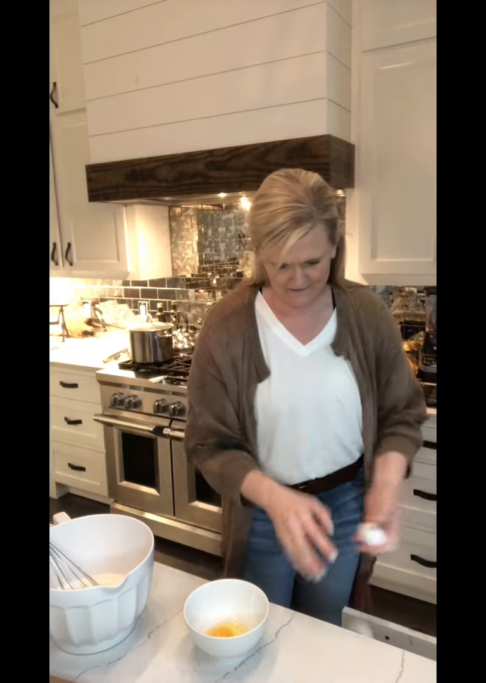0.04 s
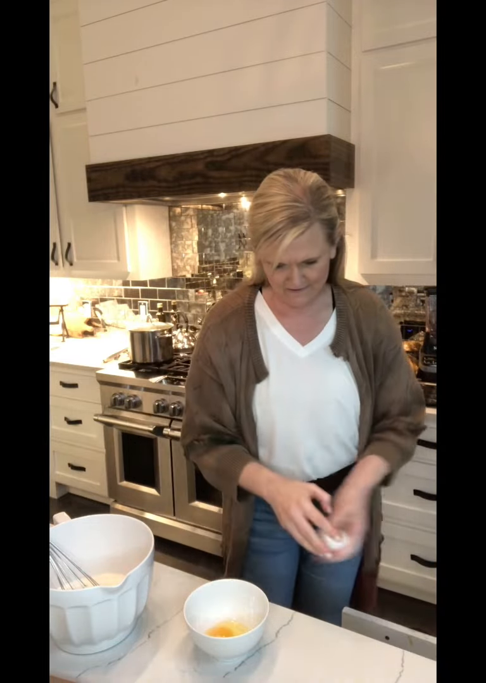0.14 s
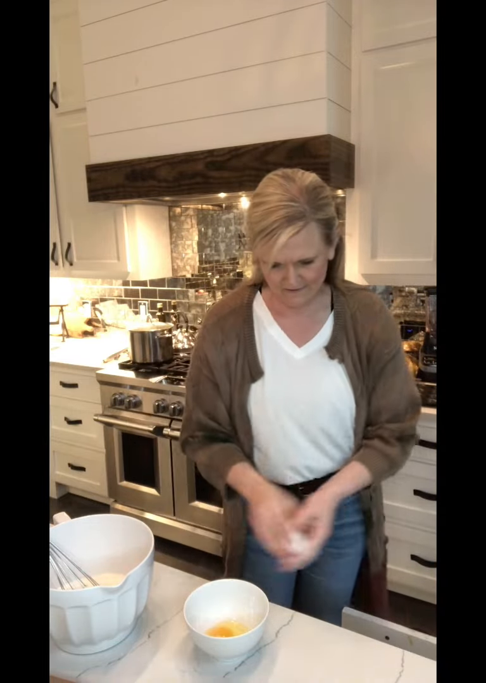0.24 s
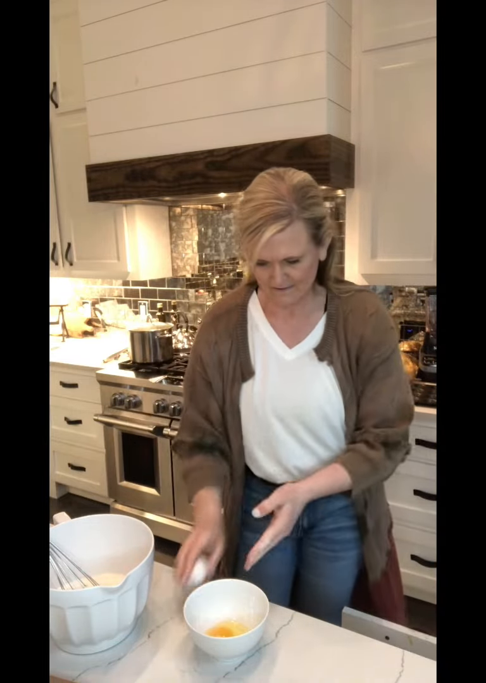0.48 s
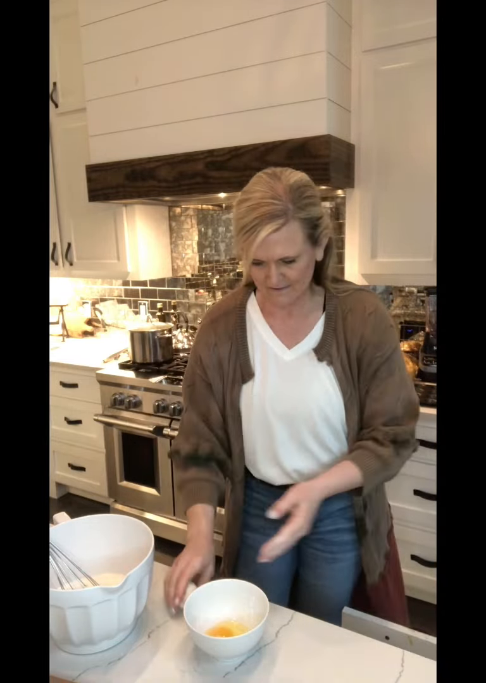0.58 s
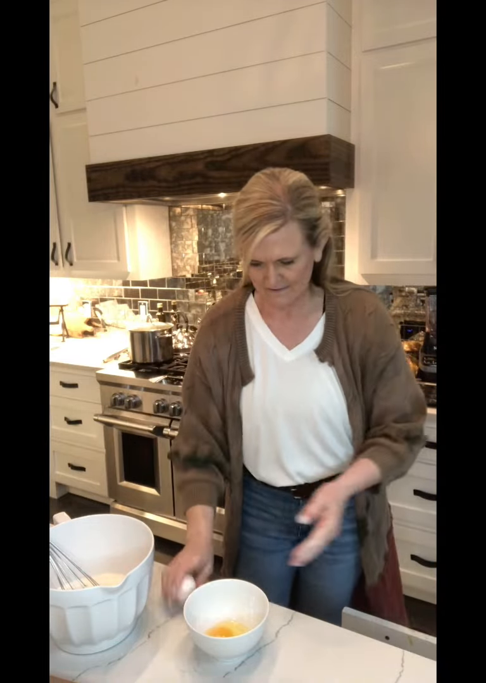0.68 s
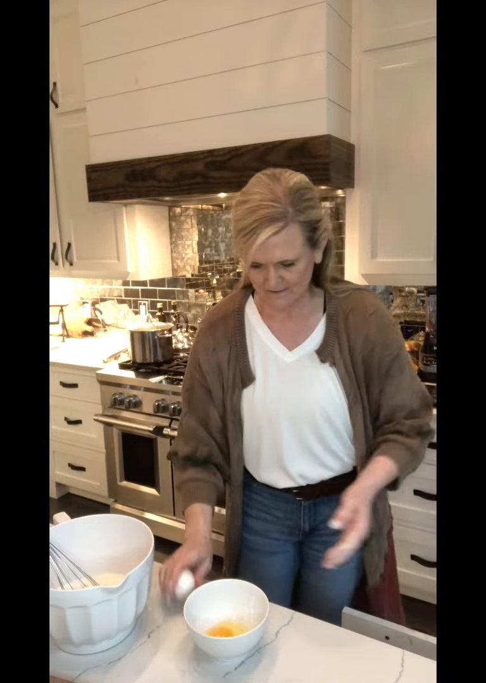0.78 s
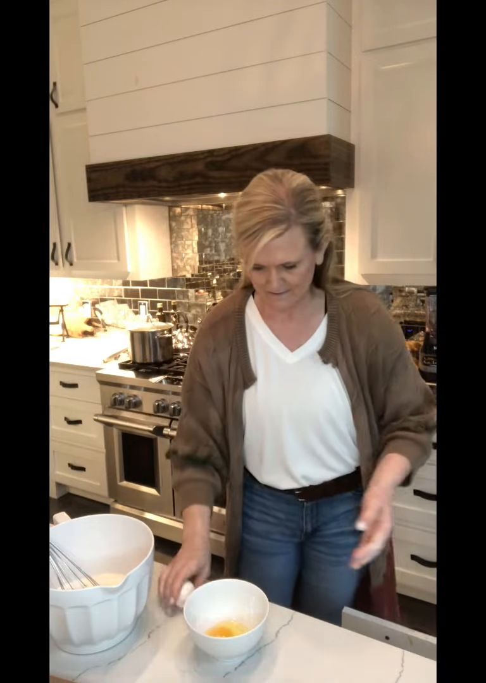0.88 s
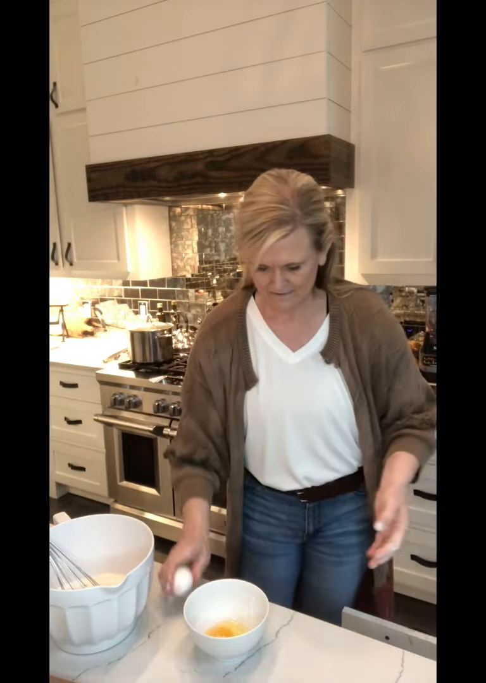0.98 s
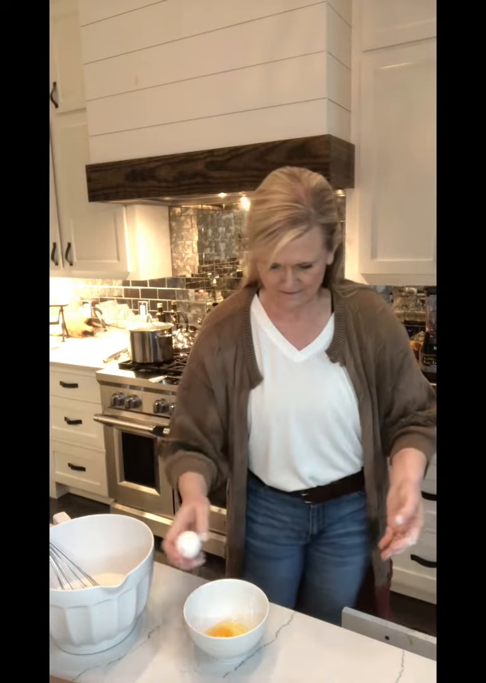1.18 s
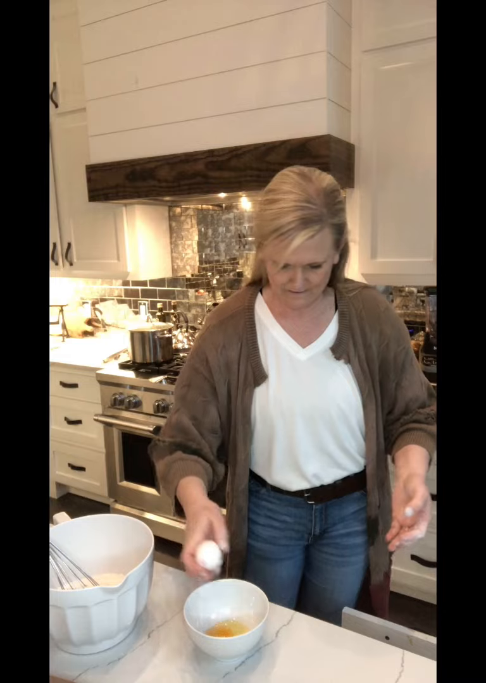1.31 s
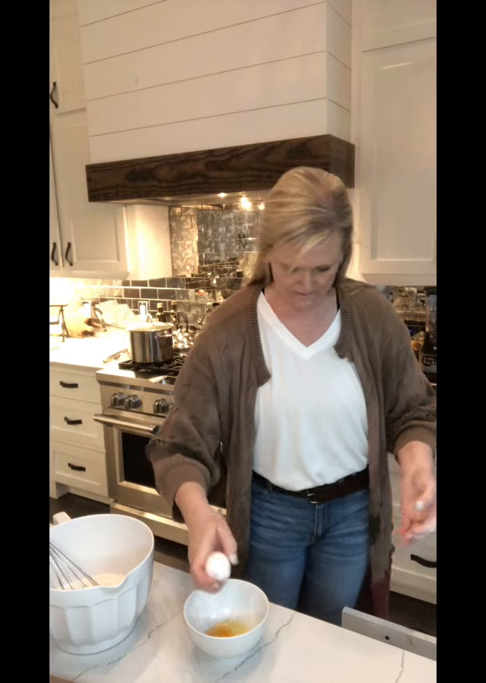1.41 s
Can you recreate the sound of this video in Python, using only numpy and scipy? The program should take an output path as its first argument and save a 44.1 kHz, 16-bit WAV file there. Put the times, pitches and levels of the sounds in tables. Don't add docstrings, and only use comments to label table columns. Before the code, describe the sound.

Egg cracking in a kitchen: hollow bin knock, hand thud, two sharp raps, faint shell crackles

```python
import sys
import numpy as np
from scipy import signal
from scipy.fft import rfft, irfft, next_fast_len
from scipy.io import wavfile
from scipy.ndimage import uniform_filter1d, map_coordinates

SR = 44100
rng = np.random.default_rng(int(sys.argv[2]) if len(sys.argv) > 2 else 0)


def file_out(sig):
    cols = np.atleast_2d(sig).T
    lim = np.clip(cols, -1, 1)
    pcm = np.round(lim * 32767).astype(np.int16)
    wavfile.write(sys.argv[1], SR, pcm)


def attenuation_scalar(level_db):
    decades = np.asarray(level_db, float) / 20
    return 10 ** decades


N = 63945

WET_DB = [-51, -46, -44.5, -47, -71.5]
LAG_S = [0.00291, .003, 0.00238, 0.00184, 0.00012]
# hz, power_db_per_hz
DENTED_POWER = [(40, 3.5), (200, -9), (400, -5.5), (1500, -12.5), (2600, -10.5), (5000, -16), (9000, -19.5),
                (16000, -26)]


def unit(x):
    return x / np.sqrt(np.mean(x ** 2) + 1e-20)


def along(points, hz):
    f, v = np.transpose(points)
    return np.interp(np.log(hz + 1), np.log(f + 1), v)


def lift(peaks, hz):
    return sum(db * np.exp(-((hz - centre) / width) ** 2) for centre, width, db in peaks)


def filtered(x, response):
    m = next_fast_len(len(x) + SR // 2)
    return irfft(rfft(x, m) * response(np.fft.rfftfreq(m, 1 / SR)), m)[:len(x)]


def hiss(spectrum, patchy_db):
    z = signal.stft(rng.standard_normal(N + 512), nperseg=512)[2]
    field = uniform_filter1d(uniform_filter1d(rng.standard_normal(z.shape), 6, 0), 10, 1)
    x = signal.istft(z * attenuation_scalar(patchy_db * unit(field)), nperseg=512)[1][:N]
    return unit(filtered(x, lambda hz: attenuation_scalar(along(spectrum, hz))))


def contact_force(rise_s, contact_s, t):
    stiff_hz = 690
    grit_s, grit_db = 0.002, -3.5
    hz = np.fft.rfftfreq(len(t), 1 / SR)
    knots, spikes = rng.standard_normal((2, len(t)))
    scatter = map_coordinates(knots, [hz * contact_s * 1.3]) ** 2
    late = rise_s + contact_s / 2 * hz / (hz + stiff_hz) * scatter
    phase = -2j * np.pi * np.cumsum(late) * hz[1]
    clean = irfft(np.exp(phase), len(t)) * (t < 0.1)
    grit = spikes * (1 - np.exp(-t / rise_s)) * np.exp(-t / (contact_s + grit_s))
    return clean + attenuation_scalar(grit_db) * grit / np.linalg.norm(grit)


def ringing(hz, body, lag_s, tilt_db, piece):
    colour = attenuation_scalar(tilt_db * np.log2((hz + 100) / 2000) + lift(piece, hz))
    bending = np.exp(-2j * np.pi * lag_s * 300 * np.log((hz + 60) / SR))
    modes = 0
    for j, (centre, width, db) in enumerate(body):
        damping = 1j * hz * width
        modes = modes + (-1) ** j * attenuation_scalar(db) * damping / (centre ** 2 - hz ** 2 + damping)
    return colour * bending * modes


def strike(hits, body, lag_s, pieces=None):
    piece_width = 0.11
    scale_db = -1 - 6
    out, t = np.zeros(N + SR), np.arange(SR // 5) / SR
    for k, (start_s, db, rise_s, contact_s, tilt_db) in enumerate(hits):
        piece = []
        if pieces:
            pitch_hz, lift_db = pieces[k]
            piece = [(pitch_hz, piece_width * pitch_hz, lift_db)]
        force = contact_force(rise_s, contact_s, t)
        y = filtered(force, lambda hz: ringing(hz, body, lag_s, tilt_db, piece))
        loudest = np.sqrt(uniform_filter1d(y * y, size=SR // 100).max())
        out[round(start_s * SR):][:len(t)] += attenuation_scalar(db + scale_db) * y / loudest
    return out[:N]


def room(hits, power, wet_db):
    # hz, t60_s
    decay = [(60, 0.19), (250, 0.88), (1000, 1), (4000, 1), (8000, 0.69), (11000, 0.44), (16000, 0.35)]
    build_s = 0.0013
    out, t = np.zeros(N + 2 * SR), np.arange(SR) / SR
    for start_s, db, *_ in hits:
        hz, frame_s, z = signal.stft(rng.standard_normal(SR), SR, nperseg=256)
        z = z * attenuation_scalar(along(power, hz)[:, None] - 60 * frame_s / along(decay, hz)[:, None])
        tail = signal.istft(z, SR, nperseg=256)[1][:SR]
        tail = tail / np.sqrt(np.mean(tail[:SR // 20] ** 2))
        tail = tail * (1 - np.exp(-(t / build_s) ** 2))
        out[round(start_s * SR):][:SR] += attenuation_scalar(wet_db + db - hits[0][1]) * tail
    return out[:N]


def appliance_hum():
    # hz, power_db_per_hz
    hum = [(12, -42), (20, -7.5), (222, -0.5), (285, -1.5), (328, -0.5), (472, -0.5), (1530, -14),
           (7520, -27.5), (16000, -33.5)]
    return attenuation_scalar(-61.5) * hiss(hum, patchy_db=0.5)


def booms():
    mode_hz = [66.5, 79, 95.5]
    # start_s, level_db
    blows = [
        (0, -68),
        (0.465, -52.5),
        (0.615, -58.5),
        (0.778, -50.5),
        (1.148, -61),
    ]
    in_step_s, rise_s, t60_s = 0.0583, 0.0093, 0.83
    t = np.arange(N) / SR
    out = np.zeros(N)
    for start_s, db in blows:
        since = (t - start_s).clip(0)
        swell = attenuation_scalar(db - 60 * since / t60_s) * (1 - np.exp(-(since / rise_s) ** 2))
        out += swell * sum(np.cos(2 * np.pi * hz * (t - start_s - in_step_s)) for hz in mode_hz)
    return out


def liner():
    # hz, power_db_per_hz
    plastic = [(60, -45), (120, -16), (250, 6), (800, -7), (1700, -3), (3500, -11.5), (7000, -17),
               (16000, -29)]
    # start_s, level_db, rise_s, fall_s
    brushes = [
        (0.054, -49.5, 0.073, 0.074),
        (0.214, -38, 0.0073, 0.013),
        (0.258, -59, 0.012, 0.1),
    ]
    t = np.arange(N) / SR
    shape = np.zeros(N)
    for start_s, db, rise_s, fall_s in brushes:
        swell = np.clip((t - start_s) / rise_s, 0, 1) ** 2
        shape += attenuation_scalar(db) * swell * np.exp(-np.clip(t - start_s - rise_s, 0, None) / fall_s)
    grain_db = 1.5 * map_coordinates(rng.standard_normal(400), [t * 200])
    return attenuation_scalar(grain_db) * shape * hiss(plastic, patchy_db=1.0)


def bin_knocks():
    # start_s, level_db, rise_s, contact_s, brightness_db_per_octave
    hits = [
        (.1535, -34, 0.00082, 0.0035, -2.5),
        (.1545, -34, 0.00089, 0.0014, -1.5),
        (.173, -30, 0.0019, 0.005, -4),
        (.2158, -28.5, 0.000633, 0.00091, -0.5),
        (.229, -46, 0.00076, 0.003, -21),
        (.237, -34.5, 0.0014, 0.0037, -12),
        (.285, -39.5, 0.0025, 0.0033, -4.5),
    ]
    # pitch_hz, width_hz, level_db
    body = [(157.4, 16, 14), (239.5, 16, 12), (396, 46, -14), (600, 50, -1.5), (920, 89, -3),
            (1210, 110, 1), (2050, 75, -1.5), (2870, 370, -23), (4040, 100, -7), (4340, 230, -11),
            (6300, 830, -13), (8000, 500, -32), (10100, 1700, -21.5)]
    # pitch_hz, lift_db
    spots = [(2800, 26), (1080, 14), (800, 12), (1240, 6.5), (1900, 6), (1310, -4), (247, 6)]
    # hz, power_db_per_hz
    power = [(40, -53), (90, -25), (170, -5.5), (300, -8), (1300, -11), (3000, -24.5), (7000, -27.5),
             (16000, -39.5)]
    return strike(hits, body, LAG_S[0], spots), (hits[1:4:2], power, WET_DB[0])


def counter_thud():
    # start_s, level_db, rise_s, contact_s, brightness_db_per_octave
    hits = [
        (.4648, -25, 0.00056, 0.00073, -0.6),
        (.478, -47.5, 0.0022, 0.0051, 2),
        (.491, -34, 0.0016, 0.0014, -16),
        (.503, -38, 0.0028, 0.0035, -7),
        (.516, -43, 0.00096, 0.0013, -3.5),
        (.528, -41, 0.0016, 0.0008, -6),
    ]
    # pitch_hz, width_hz, level_db
    body = [(188, 56, -7), (260.4, 20.6, 4.5), (381, 35, -1.5), (482, 42, -7.5), (653, 46, -2.5),
            (910, 200, -13), (1280, 240, -14.5), (1727, 55, -14.5), (2370, 110, -38), (3940, 340, -24.5),
            (4990, 190, -21), (7070, 530, -26.5), (11900, 5000, -44.5)]
    # hz, power_db_per_hz
    power = [(40, -44), (120, -34), (260, -4), (500, -8.5), (1100, -21.5), (1600, -32), (5000, -41),
             (16000, -60)]
    return strike(hits, body, LAG_S[1]), (hits[:1], power, WET_DB[1])


def first_rap():
    # start_s, level_db, rise_s, contact_s, brightness_db_per_octave
    hits = [
        (.6119, -16.5, 0.00016, 0.00028, 1),
        (.6135, -24, 0.00038, 0.0016, 0),
        (.6148, -31, 0.000295, 0.0013, 0),
        (.624, -40, .003, 0.0064, 1),
    ]
    # pitch_hz, width_hz, level_db
    body = [(264, 120, 12), (547, 220, 3), (946, 260, 5), (1400, 260, 3.5), (1990, 230, 2.5),
            (2630, 310, 0), (2900, 240, -2), (4100, 340, -1.5), (4600, 240, -2), (4990, 265, -1.5),
            (6040, 410, -5.5), (8020, 1300, -11), (10600, 2700, -15.5), (14200, 2800, -15)]
    # pitch_hz, lift_db
    spots = [(2000, 1.3), (1300, 8), (4900, 2), (5200, 1.8)]
    # hz, power_db_per_hz
    power = [(40, -49), (260, 7), (500, -7), (1200, -7), (2300, -13), (5000, -14.5), (9000, -21.5),
             (16000, -27)]
    return strike(hits, body, LAG_S[2], spots), (hits[:1], power, WET_DB[2])


def second_rap():
    # start_s, level_db, rise_s, contact_s, brightness_db_per_octave
    hits = [
        (.7787, -29.5, 0.00036, 0.00043, 0),
        (.7799, -22, 0.00026, 0.00056, 0.35),
        (.7815, -27.5, 0.00036, 0.00086, 0),
        (.7828, -29, 0.000283, 0.0018, 0),
        (.794, -40, 0.0046, 0.0056, 0.82),
    ]
    # pitch_hz, width_hz, level_db
    body = [(244, 74, 7.5), (620, 270, 3), (950, 300, 1), (2060, 280, 0), (2540, 310, 4.5), (2940, 490, 0),
            (3750, 430, -2.5), (4440, 550, -1.5), (4780, 340, -0.5), (6200, 430, -5), (7900, 670, -6.5),
            (10500, 740, -12.5), (12400, 840, -7.5), (15400, 570, -11)]
    # pitch_hz, lift_db
    spots = [(2770, 4), (4430, 3.7), (3700, 3.8), (6100, 7.9), (2800, 5.3)]
    return strike(hits, body, LAG_S[3], spots), (hits[1:2], DENTED_POWER, WET_DB[3])


def shell_crackles():
    # start_s, level_db, rise_s, contact_s, brightness_db_per_octave
    snaps = [(.948, -50, 0.00065, 0.0011, -4), (1.1122, -52.5, 0.00041, 0.0014, 0),
             (1.1312, -48, 0.0012, 0.0022, -1), (1.227, -59, 0.00038, 0.0016, -4),
             (1.2294, -38, 0.00052, 0.0011, 0), (1.2314, -43.5, 0.00041, 0.0011, 0.5),
             (1.2403, -64, .0003, 0.00092, -4), (1.2467, -41.5, 0.00036, 0.00086, -0.5),
             (1.2562, -53, 0.00029, 0.00113, 0), (1.266, -53, 0.00043, 0.0015, -5),
             (1.273, -53, 0.00028, 0.0023, 2.5), (1.288, -63, .004, .015, 0),
             (1.33, -60.5, 0.0066, 0.022, 3), (1.4137, -53.5, 0.00037, 0.00065, -5)]
    # pitch_hz, width_hz, level_db
    body = [(1480, 400, -11), (2240, 190, -4), (3000, 180, -9.5), (3690, 300, -7), (4310, 370, -3.5),
            (5000, 180, -1), (5860, 300, -10.5), (6400, 240, -7.5), (7530, 510, -12), (8700, 490, -11),
            (9390, 470, -8), (10700, 340, -8), (13300, 1300, -14)]
    # pitch_hz, lift_db
    pieces = [(4950, 4), (8000, 13.5), (3780, 8), (7000, 3), (4900, 3), (4760, 3), (4700, 7), (5600, 9.5),
              (4030, -4), (3900, 11), (8900, 3), (4500, 16), (12200, 1), (2140, 2.5)]
    return strike(snaps, body, LAG_S[4], pieces), (snaps[5:8:2], DENTED_POWER, WET_DB[4])


def scene():
    # pitch_hz, width_hz, lift_db
    room_modes = [(182.7, 22, 5), (245, 59, 10.5), (370, 23, 2.5), (487, 4.3, 5.5), (627, 55, 2.5),
                  (960, 51, 2), (1356, 120, 2.5)]
    blows = [bin_knocks(), counter_thud(), first_rap(), second_rap(), shell_crackles()]
    direct = sum(near for near, _ in blows)
    wet = sum(room(*feed) for _, feed in blows)
    uneven = rng.standard_normal(SR // 100)

    def room_colour(hz):
        return attenuation_scalar(lift(room_modes, hz) + 1.5 * map_coordinates(uneven, [hz / 60]))

    wet = filtered(wet, room_colour)
    return (direct + wet + liner() + booms() + appliance_hum())[None]


def band_limit(x):
    return signal.sosfilt(signal.butter(12, 17100, fs=SR, output="sos"), x)


def record(dry):
    # pitch_hz, width_hz, lift_db
    capsule = [(4520, 870, 2), (2300, 400, -1), (6340, 1450, 2.5)]
    low_cut_hz, end_hz = 42, 17100
    top_hz, edge_hz, top_db = 15700, 540, -20

    def microphone(hz):
        low_cut = (1j * hz / (low_cut_hz + 1j * hz)) ** 3
        treble = attenuation_scalar(top_db * np.clip((hz - top_hz) / edge_hz, 0, 1)) * (hz < end_hz)
        return attenuation_scalar(lift(capsule, hz)) * low_cut * treble

    mix = filtered(dry[0], microphone)[None]
    return band_limit(mix)


dry = scene()
out = record(dry)
file_out(out)
```